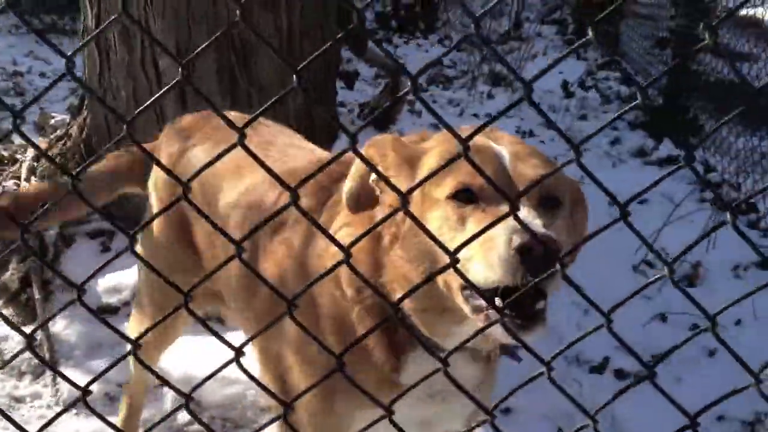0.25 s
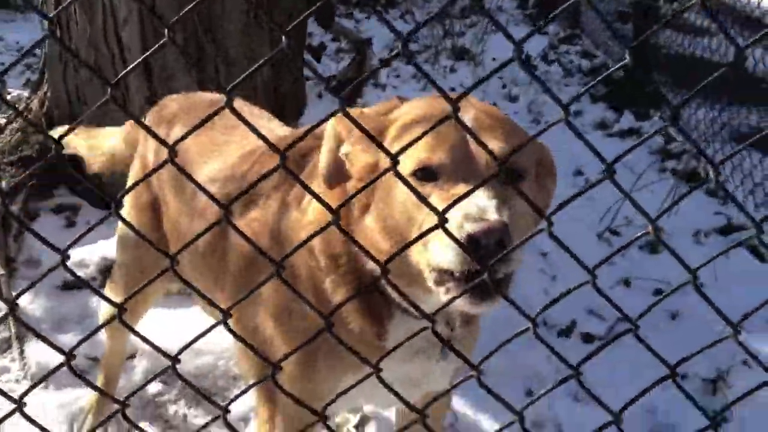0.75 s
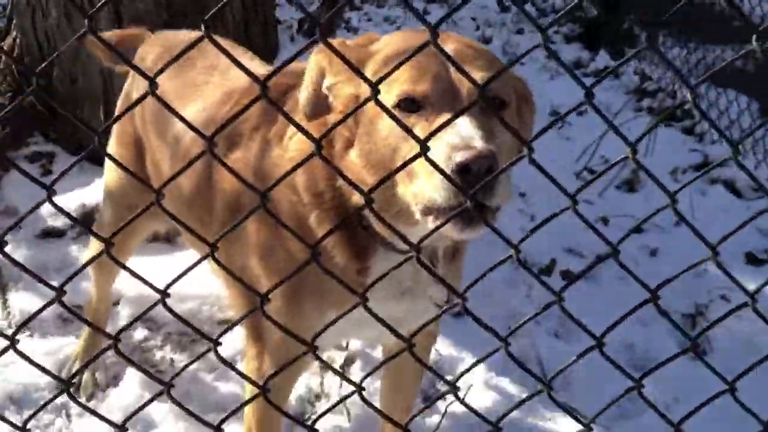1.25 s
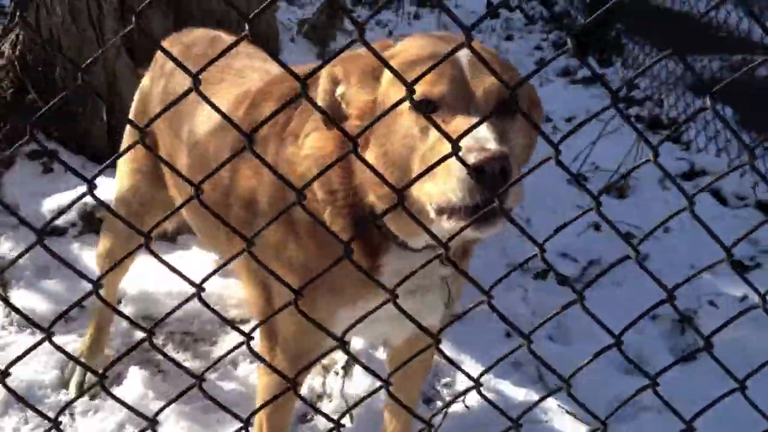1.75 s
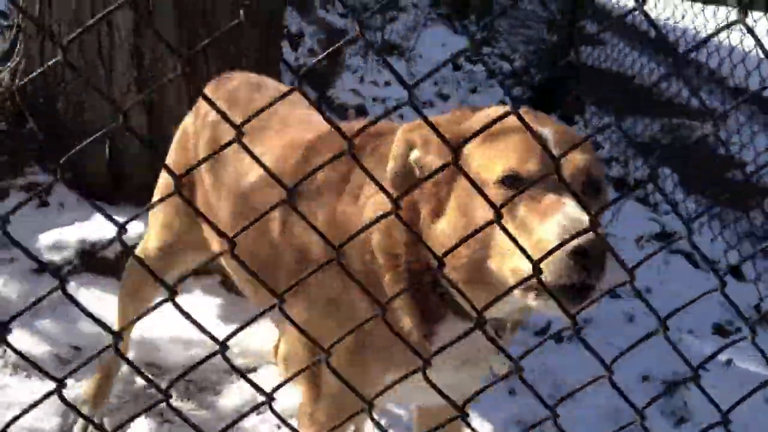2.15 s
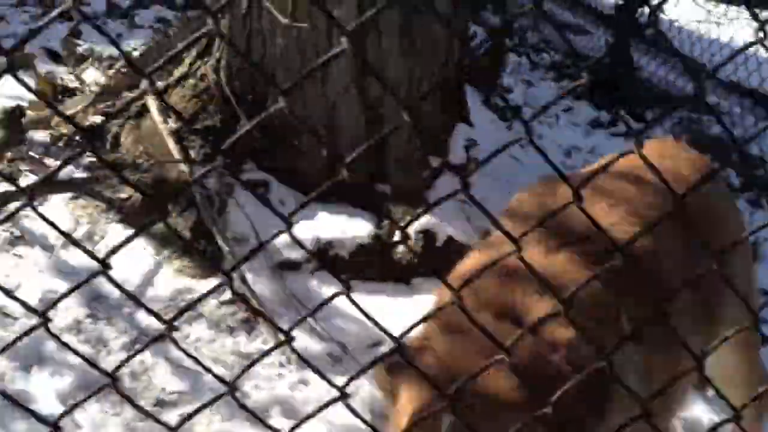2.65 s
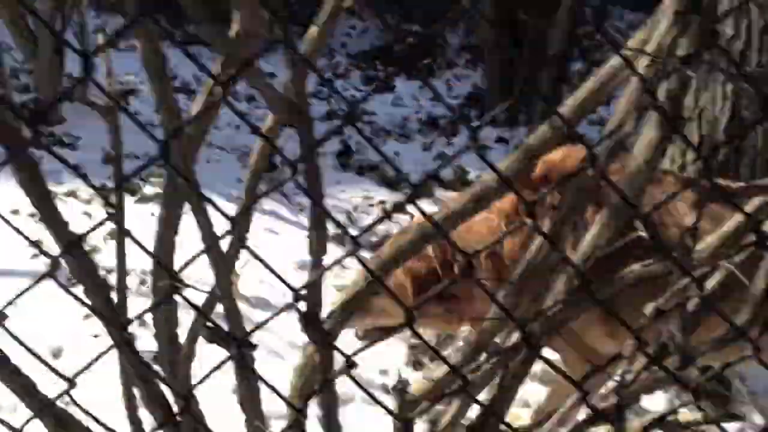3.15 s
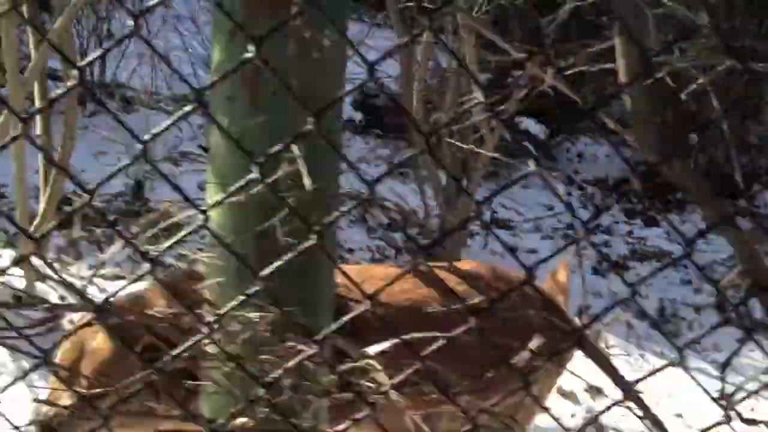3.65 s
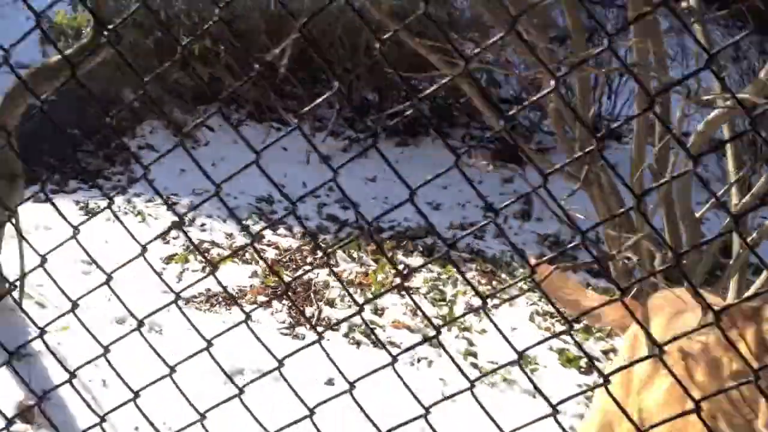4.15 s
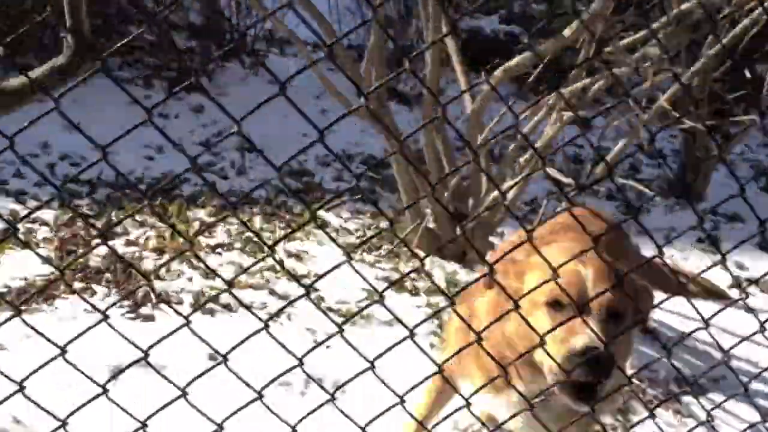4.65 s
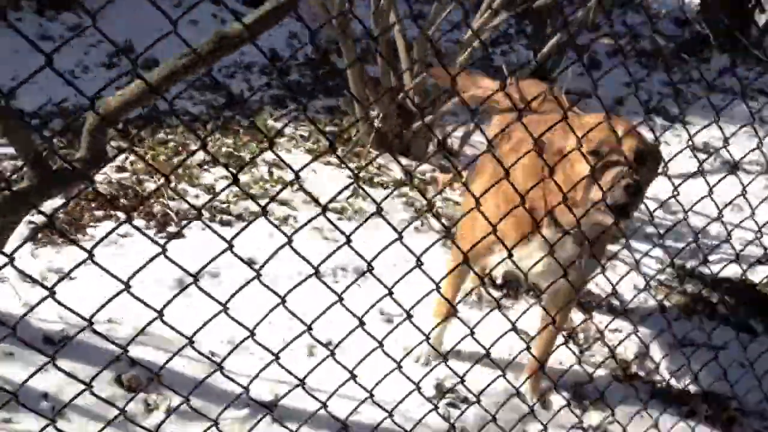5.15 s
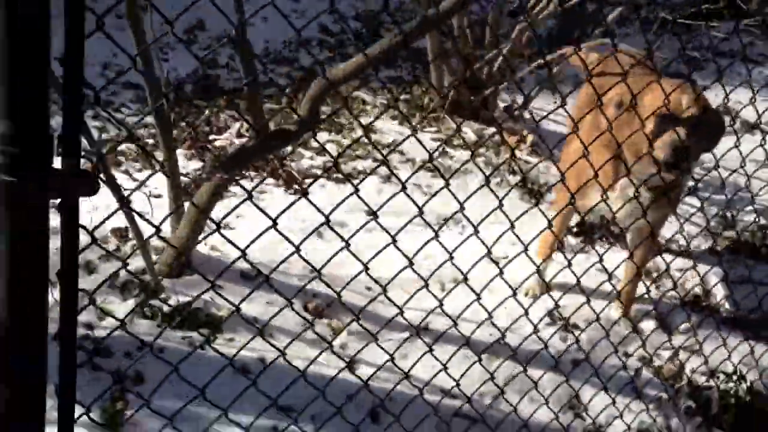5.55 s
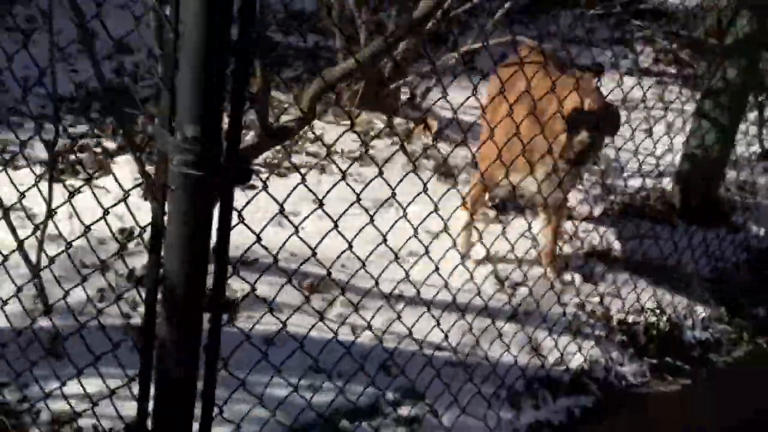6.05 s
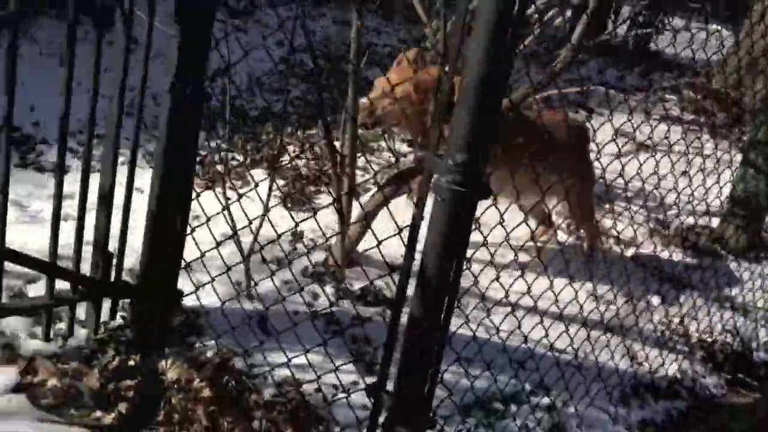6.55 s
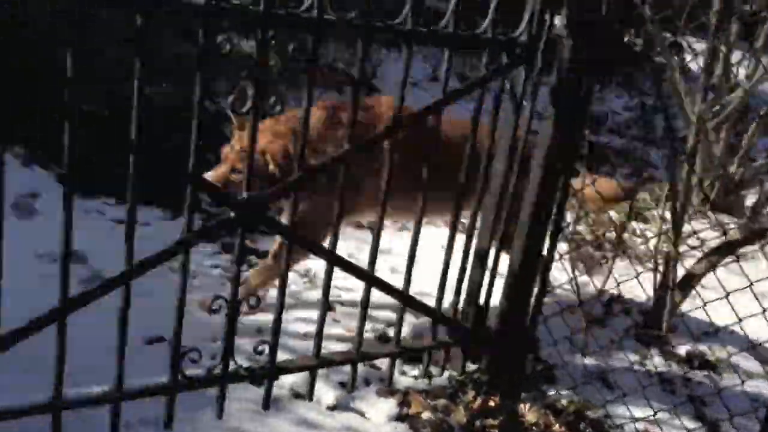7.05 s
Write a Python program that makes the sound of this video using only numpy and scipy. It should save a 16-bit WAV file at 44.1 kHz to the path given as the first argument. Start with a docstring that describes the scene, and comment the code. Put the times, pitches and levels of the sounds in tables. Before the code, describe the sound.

Close by in a yard, a big dog gives a rattling grunt and growls, then lets out two pairs of raspy barks with huffs between them. It growls again and ends with a single bark. Metal collar tags jingle as it moves, while snow, dry leaves and twigs rustle and snap underfoot. A distant street hums softly underneath.

```python
"""A large dog at a fence

A dog huffs, growls, barks twice, trots along a wire fence, barks twice more, growls and barks again.
Its voice is a source and a filter: vocal folds and breath excite the resonances of chest, throat and
mouth. Collar tags ring when struck, and crusted snow and twigs crunch under a walker's footsteps. The
yard reflects dog and collar, a far street hums, and a limiter flattens the barks."""
import sys
import numpy as np
from scipy import signal
from scipy.fft import rfft, irfft
from scipy.io import wavfile
from scipy.ndimage import uniform_filter1d, minimum_filter1d

SR = 44100
rng = np.random.default_rng(int(sys.argv[2]) if len(sys.argv) > 2 else 0)


def dump_mix(stems):
    """Bounce the given channels to the path in sys.argv[1] as a 16-bit WAV at rate SR."""
    frames = np.atleast_2d(stems).T  # one column per channel
    limited = np.clip(frames, -1, 1)  # hard clip at full scale
    pcm = np.round(limited * 32767).astype(np.int16)
    wavfile.write(sys.argv[1], SR, pcm)


N = 321930

# spectrum of the far street: frequency_hz, density_db
STREET_SPECTRUM = [(35, -37), (60, -34.5), (146, 5), (882, -6), (2770, -25.5), (14600, -29.5),
                   (16000, -12.5)]
# huffs and grunts: start_s, length_s, effort_db, fade_db, chest_db, muzzle_db, muzzle_hz
HUFFS = [(0.0, .4, -41.5, -16, -4.5, 0.5, 1670), (0.761, 0.18, -63.5, -10.5, 21.5, 6, 1440),
         (2.772, 0.37, -39.5, -10.5, 0.5, -0.5, 1160), (3.19, 0.42, -44.5, -13.5, 6.5, -2, 1420),
         (3.59, 0.15, -53.5, -5.5, 3.5, 1, 1330), (4.021, .15, -34.5, 10, -15.5, -18.5, 1200),
         (4.558, .27, -40, -13.5, -3, 1.5, 1160), (6.402, .3, -53, -9, -11, -10, 1240),
         (6.583, 0.064, -55, -12, 11, -1, 1280), (6.767, 0.19, -55.5, -7, -3, -15, 1380)]
# movement in snow and dry leaves: time_s, level_db
RUSTLE_LEVELS = [(0.0, -52), (0.1, -42), (0.27, -64.5), (0.9, -68), (2.15, -51), (2.73, -52), (3.1, -53.5),
                 (3.17, -56), (3.53, -46.5), (3.76, -49), (4.2, -49.5), (4.39, -48.5), (4.91, -52),
                 (4.95, -59.5), (5.09, -49.5), (5.4, -54.5), (6.22, -49.5), (6.5, -59), (6.89, -52),
                 (7.3, -59)]
# spectrum of the rustle: frequency_hz, density_db
RUSTLE_SPECTRUM = [(290, -13.5), (500, -29.5), (575, -18.5), (1310, -11), (3330, -17.5), (14000, -20.5)]
# scuffs on the crust: start_s, level_db
SCUFFS = [(0.579, -54), (0.83, -52), (0.96, -54), (1.2, -44), (1.43, -56), (2.853, -33.5), (2.95, -44.5),
          (3.275, -38.5), (3.588, -35.5), (4.855, -59), (5.02, -55), (5.421, -38), (5.848, -42),
          (6.225, -44)]
# rolls of fold slaps: start_s, end_s, spacing_s, alternate_early_s, peak_db, slope_db_per_s, mouth_hz
CREAKS = [ (0.054, 0.35, .0404, .002, -21, -30, 1080), (3.319, 3.42, .0222, 0, -31, 50, 1400),
          (3.446, 3.52, .031, .009, -23, -50, 1400), (6.415, 6.56, .042, .002, -33, -60, 1200),
          (6.579, 6.68, .028, 0, -33, -50, 1250), (6.779, 6.97, .0425, .011, -32, -40, 1400), ]
# throat modes rung by a slap: frequency_hz, width_hz, level_db
THROAT_MODES = [(569, 123, 3), (1984, 860, 2), (3640, 164, -20.5)]
# crust and twigs breaking under a walker's footsteps: start_s, peak_db, centre_hz
SNAPS = [(0.4115, -38, 1250), (0.7133, -38.5, 1860), (0.7452, -25.5, 1780), (0.827, -35.5, 2350),
         (1.1962, -22.5, 1400), (1.6497, -32, 1600), (2.0541, -22, 2160), (2.7925, -27, 1240),
         (3.6205, -28.5, 1360), (4.58, -31, 2010), (5.0995, -32.5, 1270), (5.421, -28, 940),
         (5.8736, -26, 1570), (6.6329, -34.5, 1070), (6.777, -40, 1510), (6.616, -43, 3000),
         (6.829, -40, 3030), (6.857, -37, 2600), (6.895, -38.5, 2190), (4.888, -46, 2000)]
# collar tags colliding: start_s, upper_peak_db, lower_relative_db
CHINKS = [(0.622, -37.5, -4), (0.7213, -32.5, -9), (2.7242, -37, -7.5), (2.807, -39.5, 5.5),
          (2.853, -10.5, -21), (3.1123, -24, -11), (3.1462, -35, -19), (3.185, -37, -3), (3.2969, -36, -6),
          (3.3348, -35, -15), (3.429, -32, 0), (3.467, -37, 0), (3.5638, -38, -12), (3.584, -27, -9),
          (4.2328, -27, -16), (4.862, -30.5, 0.5), (5.1814, -33, -2.5), (6.5191, -40, -11),
          (6.544, -30.5, -19), (6.7248, -21.5, -11.5), (6.769, -26.5, -7), (6.822, -33, -8),
          (6.853, -35, -9), (6.885, -35, -4.5)]
# modes of the two tags: frequency_hz, width_hz, level_db
UPPER_TAG_MODES = [(15160, 330, 27), (16200, 100, 21), (13300, 84, 3)]
LOWER_TAG_MODES = [(8850, 110, -3.5), (8300, 300, 3)]
# one curve a growl: time_s, effort_db
GROWL_CURVES = [
    [(0.95, -65), (1.192, -44.5), (1.392, -50), (1.908, -43.5), (2.18, -28.5), (2.21, -1)],
    [(5.13, -47), (5.2, -36.5), (5.818, -46), (6.08, -32), (6.19, -27), (6.26, -37.5), (6.32, -63)],
]
# cavities, one row a growl: chest_db, muzzle_db (both at middle effort), muzzle_lag_db_per_db,
# throat_hz, lower_muzzle_hz, upper_muzzle_hz, upper_throat_db
GROWL_CAVITIES = [(1.5, -6, 0.53, 573, 1560, 2090, -13.5), (-7, -8.5, 0.29, 440, 1514, 2220, -4)]
# air through the nose: frequency_hz, width_hz, level_db
NOSE_BANDS = [(4540, 340, -23), (5730, 590, -23.5), (7720, 1550, -14.5)]
# one curve a bark: time_s, pitch_hz, effort_db, opening_fraction, roughness_fraction
BARK_CURVES = [
    [(2.18, 432.8, -34, 0.3, 0.7), (2.208, 432.3, -14, .14, 0.99), (2.232, 432.2, -8.5, 0.12, 0.92),
     (2.27, 450, -14.5, 0.86, 0.81), (2.31, 477.3, -12, 0.24, 0.54), (2.355, 466, -11.5, 0.55, 0.25),
     (2.395, 399, -19, 0.75, 0.3), (2.43, 504.5, -15, 0.08, 0.42), (2.48, 467, -21.5, 0.06, 0.54)],
    [(2.48, 476.5, -26.5, 0.38, 0.37), (2.51, 450.8, -14.5, 0.24, 0.65), (2.55, 518.6, -8.5, 0.36, 0.48),
     (2.59, 513.7, -12, 0.41, 0.37), (2.62, 423.6, -15, 0.47, 0.77), (2.655, 393, -21, 0.81, 0.6),
     (2.7, 396, -32.5, 0.24, 0.5), (2.74, 397, -63, .2, 0.6)],
    [(3.77, 498, -35, 0.47, 0.6), (3.795, 541, -11.5, 0.35, 0.19), (3.812, 427.7, -12.5, 0.71, 0.42),
     (3.84, 470.4, -12, 0.92, 0.13), (3.89, 476.7, -12.5, 0.4, 0.24), (3.925, 493.3, -13.5, 0.41, 0.54),
     (3.945, 432.2, -11, 0.68, 0.16), (3.98, 421.4, -19.5, 0.07, 0.48), (4.0, 357, -25.5, 0.19, 0.3),
     (4.04, 477, -36, 0, .1)],
    [(4.14, 398, -27.5, 0.06, 1.08), (4.175, 388.3, -13.5, 0.28, 0.56), (4.2, 425.7, -12, 0.33, 0.48),
     (4.23, 455.5, -13.5, 0.19, 0.58), (4.26, 424, -12, 0.69, 0.52), (4.3, 451.4, -16, .2, 0.53),
     (4.335, 406, -18.5, .3, 0.54), (4.365, 320.3, -27.5, 0.04, 0.02), (4.4, 438, -30, 0.05, 0.44),
     (4.435, 460, -27.5, 0.06, 0.2), (4.5, 383, -45.5, 0.29, 0.65)],
    [(7.01, 478.2, -43, 0.33, 0.8), (7.05, 477.2, -17, 0, 1.05), (7.07, 486.3, -11, 0.72, 0.48),
     (7.1, 442.6, -9, 0.53, 0.24), (7.13, 514, -14, 0.38, 0.25), (7.18, 519.6, -18, 0.43, 0.65),
     (7.21, 473, -23, 0.38, 0.87), (7.235, 386.5, -25, 0.47, 0.32), (7.3, 340, -35.5, 0.07, 1.05)],
]
# one row a bark, levels relative to effort: bite_db, hiss_db, top_hiss_db, widest_after_s, gape_s
JAWS = [(-13.5, -28, -36, 0.11, .06), (-17.5, -29, -50.5, .06, 0.022), (-7, -27, -39.5, 0.058, 0.02),
        (-11.5, -22.5, -53, 0.096, 0.04), (-9, -32, -33, 0.053, 0.067)]
# upper harmonics of a bark, relative to its bite: pitch_multiple, level_db
OVERTONES = [(4, -4.), (5, -5), (6, -7.5)]
# formants of the open mouth, a bark's bright "bite": frequency_hz, width_hz, level_db
BITE_FORMANTS = [(1817, 575, 7.5), (2360, 227, 5), (2900, 330, -28)]
# air past the teeth: frequency_hz, width_hz, level_db
TEETH_BANDS = [(5640, 300, 2.5), (6660, 860, 7.5), (8140, 460, -3), (12300, 5100, -20)]


def gain_of(db):
    """Amplitude ratio of a level in decibels."""
    return 10 ** (np.asarray(db) / 20)


def unit_rms(x):
    """Normalisation to rms 1."""
    return x / np.sqrt(np.mean(x ** 2) + 1e-20)


def add(mix, start_s, sound):
    """Superposition: a sound joins the mix at start_s."""
    part = mix[round(start_s * SR):][:len(sound)]
    part += sound[:len(part)]


def curves(rows):
    """Linear interpolation: the start time, and each further column sample by sample."""
    times, *values = np.transpose(rows)
    t = np.arange(times[0], times[-1], 1 / SR)
    return times[0], [np.interp(t, times, column) for column in values]


def coloured(x, spectrum):
    """Spectral shaping by (frequency_hz, density_db) points; rms 1."""
    points_hz, db = np.transpose(spectrum)
    hz = np.fft.rfftfreq(len(x), 1 / SR)
    response = gain_of(np.interp(np.log(hz + 1), np.log(points_hz), db))
    return unit_rms(irfft(rfft(x) * response, len(x)))


def drift(n, hz):
    """Random modulation: noise low-passed at hz; rms 1."""
    bins_hz = np.fft.rfftfreq(n, 1 / SR)
    return unit_rms(irfft(rfft(rng.standard_normal(n)) / (1 + (bins_hz / hz) ** 4), n))


def formant(x, hz, width_hz):
    """Two resonators in cascade, each shifting hz to zero, smoothing and shifting back; rms 1."""
    carrier = np.exp(2j * np.pi * np.cumsum(hz * np.ones(len(x))) / SR)
    pole = np.exp(-np.pi * width_hz / SR)
    for _ in range(2):
        x = 2 * (carrier * signal.lfilter([1 - pole], [1, -pole], x / carrier)).real
    return unit_rms(x)


def ring(modes, force):
    """Modal response: a force excites damped sinusoids that swell over their first cycles; peak 1."""
    t = np.arange(4000) / SR
    response = np.zeros(len(t))
    for hz, width_hz, db in modes:
        envelope = (1 - np.exp(-hz * t / 2)) * np.exp(-np.pi * width_hz * t)
        response += gain_of(db) * envelope * np.sin(2 * np.pi * hz * t)
    out = signal.oaconvolve(force, response)
    return out / abs(out).max()


def street():
    """Ambient noise: the far street is a low hush whose level wanders slowly."""
    return gain_of(-56 + 2.2 * drift(N, hz=1.5)) * coloured(rng.standard_normal(N), STREET_SPECTRUM)


def slack_folds(n, airy, throb_db):
    """Aperiodic vibration: slack folds flap unevenly near 110 Hz, each flap releasing a puff of air."""
    cycles = np.cumsum(110 * gain_of(2.5 * drift(n, hz=40.02))) / SR
    flaps = np.diff(np.floor(cycles), prepend=0) * gain_of(6.8 * np.clip(rng.standard_normal(n), -2, 2))
    puffs = (0.8 + np.exp(-(cycles % 1) / 0.66)) * rng.standard_normal(n)
    return (unit_rms(flaps) + airy * unit_rms(puffs)) * gain_of(throb_db * drift(n, hz=26))


def huff(length_s, effort_db, fade_db, chest_db, muzzle_db, muzzle_hz):
    """Damped resonance: with the mouth ajar the cavities ring broadly, each catching its own gusts."""
    t = np.arange(0, length_s, 1 / SR)
    level_db = effort_db + np.interp(t, [0, 0.047, length_s], [-4.5, 0, fade_db])
    source = slack_folds(len(t), airy=1.64, throb_db=1.3)

    def cavity(hz, width_hz):
        """A formant, amplitude-modulated by gusts; rms 1."""
        return unit_rms(formant(source, hz, width_hz) * gain_of(2.8 * drift(len(t), hz=8.9)))

    muzzle = unit_rms(cavity(muzzle_hz, 290) + 0.82 * cavity(2127, 620))
    throat, chest = cavity(604, 340), cavity(194, 126)
    out = throat - gain_of(chest_db) * chest + gain_of(muzzle_db) * muzzle
    return gain_of(level_db) * out * signal.windows.tukey(len(t), 0.08)


def rustle(grains_per_s=3000):
    """Shot noise: many tiny fractures merge into a rustle that flares at each scuff of the snow."""
    sizes = gain_of(1.23 * np.minimum(rng.exponential(1, N), 5))
    grains = sizes * (rng.random(N) < grains_per_s / SR) * rng.standard_normal(N)
    crunch = coloured(grains + 0.18 * rng.standard_normal(N), RUSTLE_SPECTRUM)
    flicker = gain_of(2.6 * drift(N, hz=25))
    envelope = gain_of(np.interp(np.arange(N) / SR, *np.transpose(RUSTLE_LEVELS)))
    t = np.arange(6000) / SR
    scuff = np.minimum(t / 0.0022, 1) * np.exp(-t / 0.013)
    for start_s, db in SCUFFS:
        add(envelope, start_s, gain_of(db) * scuff)
    return crunch * flicker * envelope


def creaks():
    """Vocal fry: each slap of the slack folds rings throat and mouth, just after a fainter slap."""
    out = np.zeros(N)
    for start_s, end_s, spacing_s, early_s, peak_db, slope_db_per_s, mouth_hz in CREAKS:
        slap = ring(THROAT_MODES + [(mouth_hz, 120, -6), (260, 200, -5)], force=np.ones(1))
        for k, beat_s in enumerate(np.arange(start_s, end_s, spacing_s)):
            db = peak_db + slope_db_per_s * (beat_s - start_s) + 0.68 * rng.standard_normal()
            slap_s = beat_s - k % 2 * early_s
            add(out, slap_s - 0.001, gain_of(db) * slap)
            add(out, slap_s - 0.013, gain_of(db - 11) * slap)
    return out


def footsteps():
    """Brittle fracture: a crack and a tail of crumbs excite two heavily damped modes of crust or twig."""
    out, t = np.zeros(N), np.arange(2000) / SR
    for start_s, peak_db, hz in SNAPS:
        crumbs = 0.5 * np.exp(-t / 0.023) * gain_of(5.5 * drift(len(t), hz=302))
        force = rng.standard_normal(len(t)) * (np.exp(-t / 0.0025) + crumbs)
        add(out, start_s, gain_of(peak_db) * ring([(hz, 1200, 0), (hz * 1.52, 2500, -6)], force))
    return out


def collar_tags():
    """Impact excitation: two small metal plates chatter for some milliseconds and ring in their modes."""
    out, t = np.zeros(N), np.arange(1800) / SR
    for start_s, peak_db, lower_db in CHINKS:
        chatter = rng.standard_normal(len(t)) * (np.exp(-t / 0.006) + 0.11 * np.exp(-t / 0.013))
        chink = ring(UPPER_TAG_MODES, chatter) + gain_of(lower_db) * ring(LOWER_TAG_MODES, chatter)
        add(out, start_s, gain_of(peak_db) * chink)
    return out


def growl(effort_db, cavities, middle_db=-42.5):
    """Source and filter: slack folds drive chest, throat and shut muzzle while air hisses in the nose."""
    chest_db, muzzle_db, muzzle_lag, throat_hz, lower_hz, upper_hz, upper_throat_db = cavities
    n, push_db = len(effort_db), effort_db - middle_db
    source = slack_folds(n, airy=1.7, throb_db=1.8)
    throat = formant(source, throat_hz, 277) + gain_of(upper_throat_db) * formant(source, 729, 120)
    # chest and muzzle swell less than the throat; with effort the lips lift into a brighter snarl
    chest = gain_of(chest_db - 0.4 * push_db) * formant(source, 212, 212)
    snarl = gain_of(-20.5 + 0.6 * push_db) * formant(source, 1058, 284)
    pinch = 0.1 * np.exp(-np.arange(n) / SR / 0.16)  # two muzzle formants start closer, then part
    muzzle = formant(source, lower_hz * (1 + pinch / 2), 120)
    muzzle += formant(source, upper_hz * (1 - pinch), 124) + 0.37 * formant(source, 1950, 230)
    muzzle = gain_of(muzzle_db - muzzle_lag * push_db + 2.3 * drift(n, hz=7.1)) * unit_rms(muzzle)
    wander, air = 1 + 0.025 * drift(n, hz=4.1), rng.standard_normal(n)
    nose = sum(gain_of(db + 2.5 * drift(n, hz=30)) * formant(air, hz * wander, width_hz)
               for hz, width_hz, db in NOSE_BANDS)
    nose *= gain_of(-0.7 * (effort_db - np.median(effort_db)))  # airflow swells less than the voice
    return gain_of(effort_db) * (throat - chest + snarl + muzzle + nose) * signal.windows.tukey(n, 0.04)


def taut_folds(pitch_hz, effort_db, rough, mouth_hz, bite_db):
    """Harmonic series of taut folds, lifted near the mouth formant; returns the tone and its cycles."""
    n, orders = len(pitch_hz), np.arange(1, 4)[:, None]
    mouth_boost = 1 + gain_of(18) / (1 + ((orders * pitch_hz - mouth_hz) / 173) ** 2) ** 2
    low_gains = gain_of(-6.5 * np.log2(orders)) * mouth_boost
    low_gains *= gain_of(effort_db) * np.sqrt((1 - rough ** 2) / (low_gains ** 2).sum(0))
    harmonics = list(zip((1, 2, 3), low_gains))
    harmonics += [(k, gain_of(bite_db + db) * (1 - rough)) for k, db in OVERTONES]
    # the folds take a moment to lock, and wobble again when the push is weak
    weak_db = np.clip(-19 - effort_db, 0, 12)
    jitter = 0.004 + 0.035 * rough ** 2 + 0.05 * np.exp(-np.arange(n) / SR / 0.02) + 0.006 * weak_db
    cycles = np.cumsum(pitch_hz * (1 + jitter * drift(n, hz=75))) / SR
    tone, throb_db = np.zeros(n), 0.4 + 2.6 * rough + 0.06 * weak_db
    for k, gain in harmonics:
        throb = gain_of(throb_db * np.sqrt(k) * drift(n, hz=59.6))  # deeper in the upper harmonics
        tone += gain * throb * np.sqrt(2) * np.cos(2 * np.pi * k * cycles + k)
    return tone, cycles


def bark(pitch_hz, effort_db, opening, roughness, jaws, shut_hz=435, open_hz=1380):
    """Voicing with turbulence: harmonics and pulsed air pass a mouth whose formant rises as it opens."""
    bite_db, hiss_db, top_hiss_db, widest_s, gape_s = jaws
    n, rough = len(pitch_hz), np.clip(roughness, 0.01, 0.99)
    closure = 1 - np.exp(-((np.arange(n) / SR - widest_s) / gape_s) ** 2)
    bright_db = effort_db - 10.5 * closure  # bite and top hiss sink either side of the widest gape
    mouth_hz = shut_hz + (open_hz - shut_hz) * opening
    tone, cycles = taut_folds(pitch_hz, effort_db, rough, mouth_hz, bright_db + bite_db)
    puffs = (0.059 + np.exp(-(cycles % 1) / 1.56)) * rng.standard_normal(n)
    puffs *= gain_of(1.4 * drift(n, hz=50.6))
    # uneven cycles rasp: blurred lines midway between the harmonics, and a band at the mouth formant
    half_lines = sum(formant(puffs, pitch_hz * multiple, 255) for multiple in (1.5, 2.5))
    rasp = unit_rms(half_lines + 1.28 * formant(puffs, mouth_hz, 220))
    wander = 1 + 0.056 * drift(n, hz=16.7)
    bite = sum(gain_of(db) * formant(puffs, hz * wander, width_hz) for hz, width_hz, db in BITE_FORMANTS)
    hiss = sum(gain_of(db + 1.8 * drift(n, hz=18)) * formant(puffs, hz * wander, width_hz)
               for hz, width_hz, db in TEETH_BANDS)
    out = tone + rough * gain_of(effort_db) * rasp
    out += (0.55 + rough) * gain_of(bright_db + bite_db) * unit_rms(bite)
    out += gain_of(effort_db + hiss_db + 0.5 * closure) * unit_rms(hiss)
    out += gain_of(bright_db + top_hiss_db) * formant(puffs, 10200, 6800)
    return out * signal.windows.tukey(n, 0.05)


def yard_echo(x, reverb_s=0.21):
    """Scattering: fence, trunks and house walls return dull reflections that die away quickly."""
    t = np.arange(SR // 2) / SR
    taps = rng.choice([-1., 1.], len(t)) * (rng.random(len(t)) < 0.05)
    taps *= gain_of(-60 * t / reverb_s) * (t > 0.012)
    taps = signal.sosfilt(signal.butter(1, 2500, fs=SR, output="sos"), taps)
    return signal.oaconvolve(x, taps / np.linalg.norm(taps))[:N]


def scene():
    """Superposition of dog and collar, their reflections, the snow and the street, in one channel."""
    dog = creaks() + collar_tags()
    for start_s, *breath in HUFFS:
        add(dog, start_s, huff(*breath))
    for rows, cavities in zip(GROWL_CURVES, GROWL_CAVITIES):
        start_s, (effort_db,) = curves(rows)
        add(dog, start_s, growl(effort_db, cavities))
    for rows, jaws in zip(BARK_CURVES, JAWS):
        start_s, controls = curves(rows)
        add(dog, start_s, bark(*controls, jaws))
    return (dog + gain_of(-18.5) * yard_echo(dog) + rustle() + footsteps() + street())[None]


def record(dry, ceiling=0.72, edge_hz=15500):
    """Band and peak limiting: a microphone's bass roll-off, a look-ahead limiter, then a low-pass."""
    thinned = signal.sosfilt(signal.butter(3, 90, "high", fs=SR, output="sos"), dry)
    allowed_gain = np.minimum(1, ceiling / (abs(thinned) + 1e-9))
    limited = thinned * uniform_filter1d(minimum_filter1d(allowed_gain, size=129), size=65)
    low_pass = signal.firwin(511, edge_hz, window=("kaiser", 12), fs=SR)
    return signal.oaconvolve(limited, low_pass[None], "same")


dry = scene()
out = record(dry)
dump_mix(out)
```